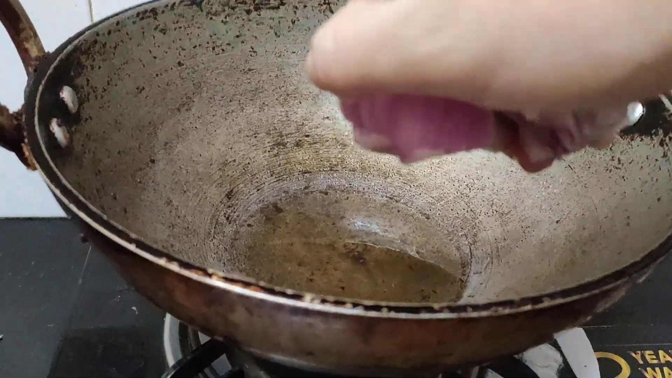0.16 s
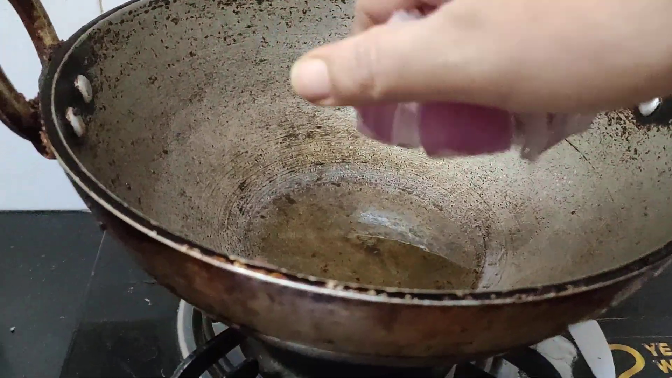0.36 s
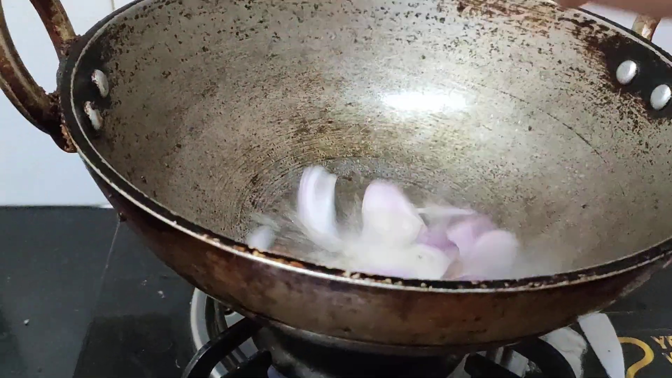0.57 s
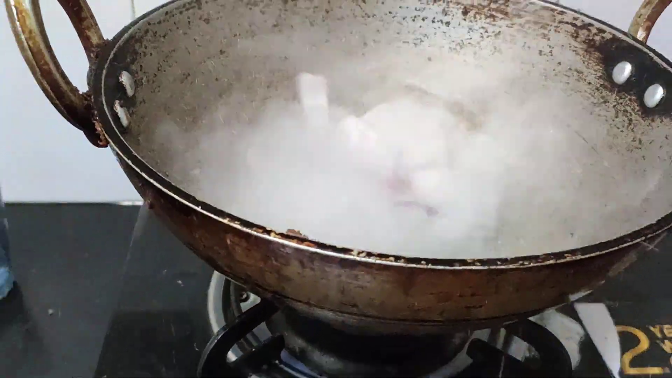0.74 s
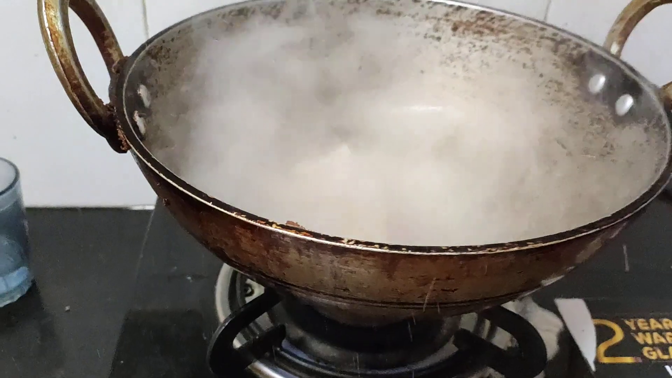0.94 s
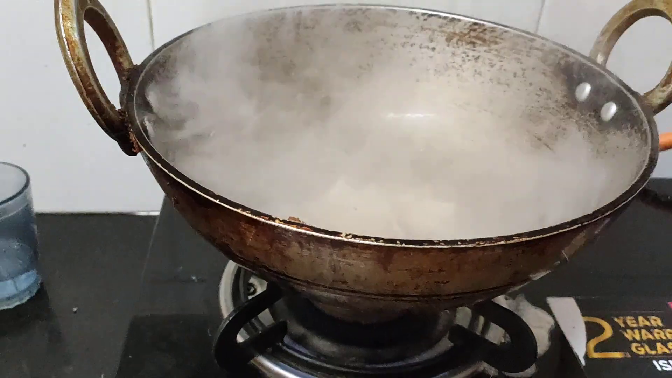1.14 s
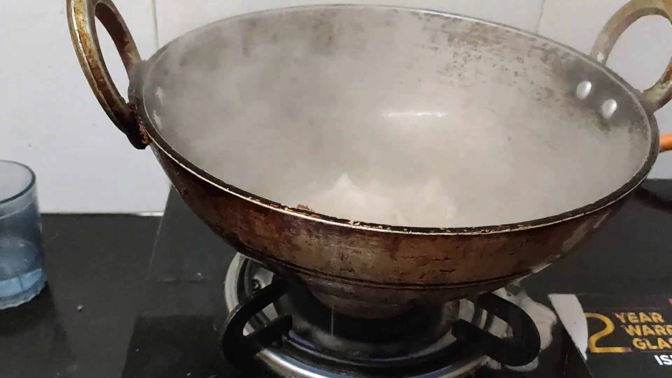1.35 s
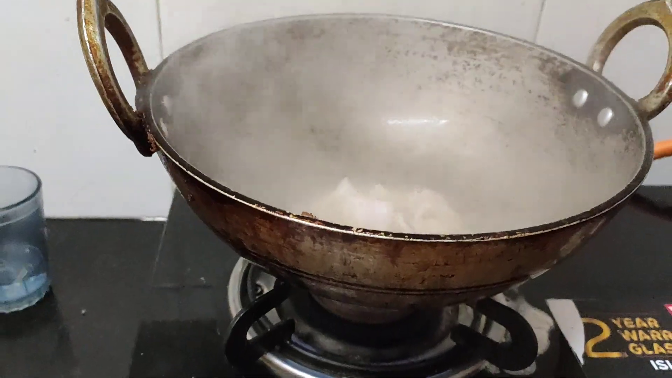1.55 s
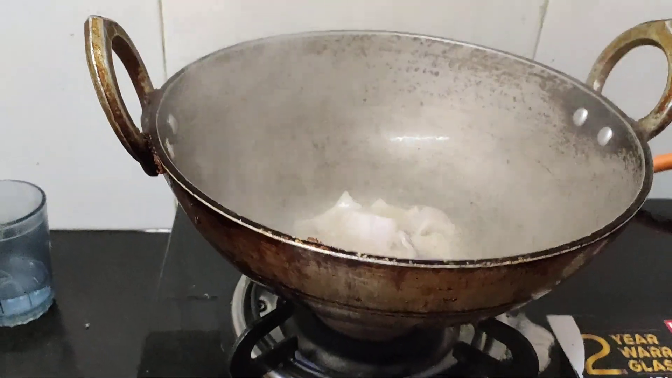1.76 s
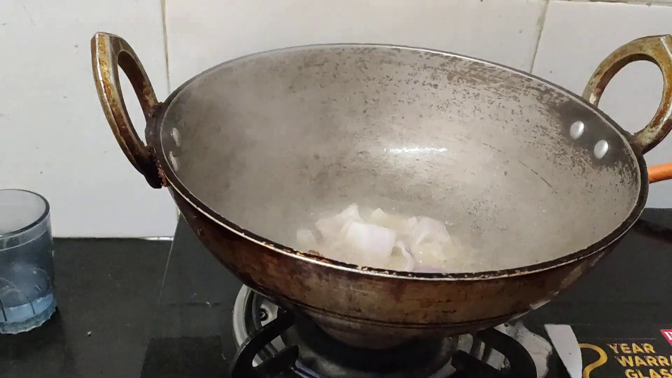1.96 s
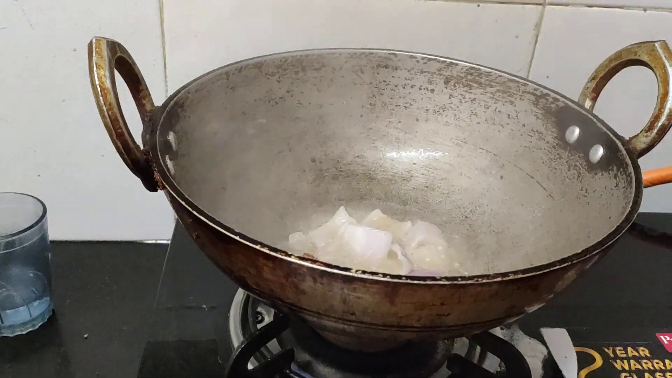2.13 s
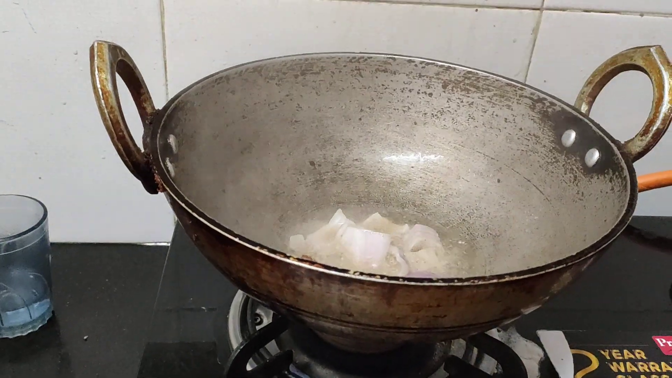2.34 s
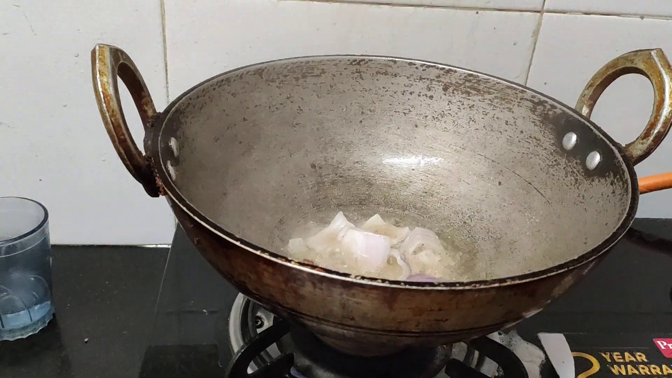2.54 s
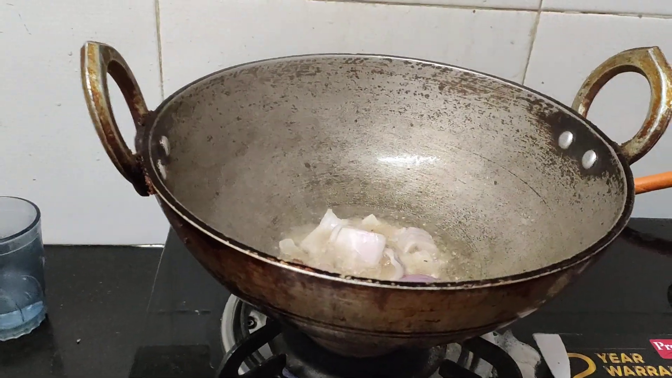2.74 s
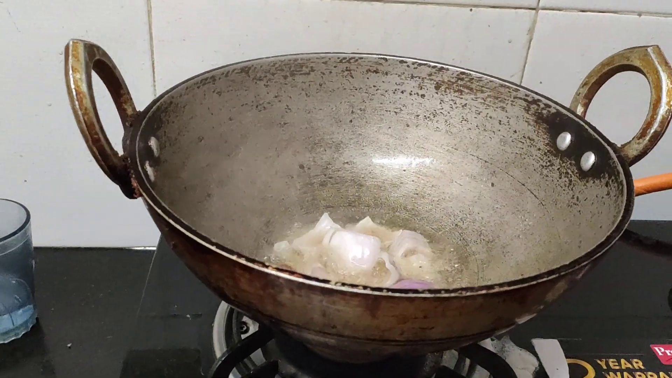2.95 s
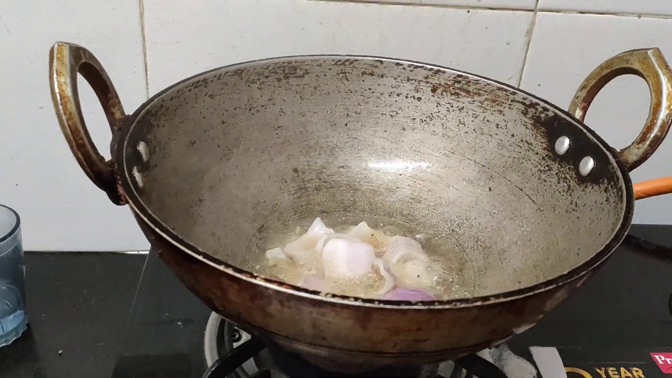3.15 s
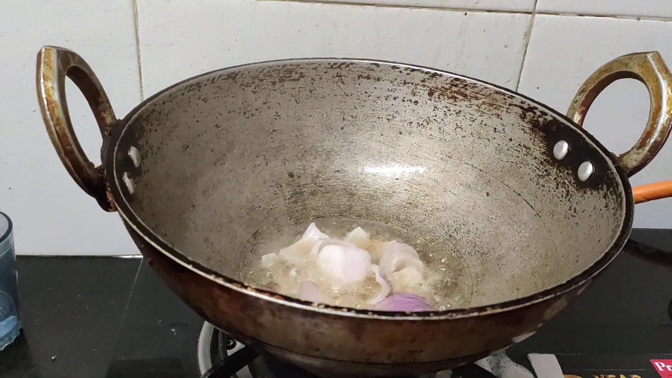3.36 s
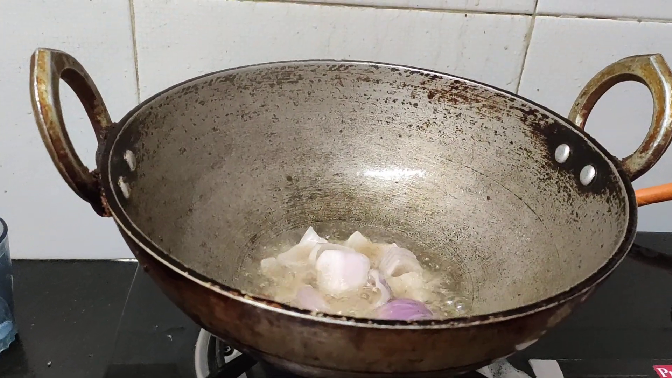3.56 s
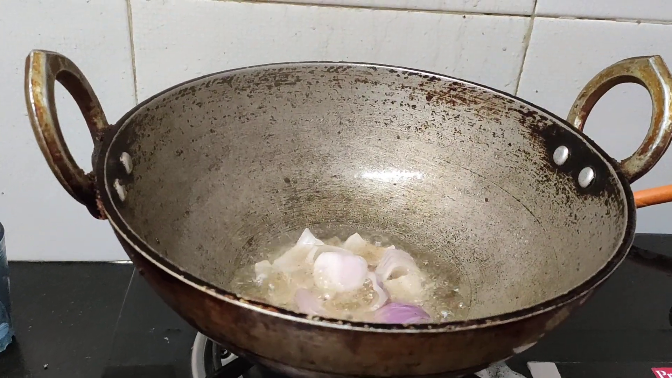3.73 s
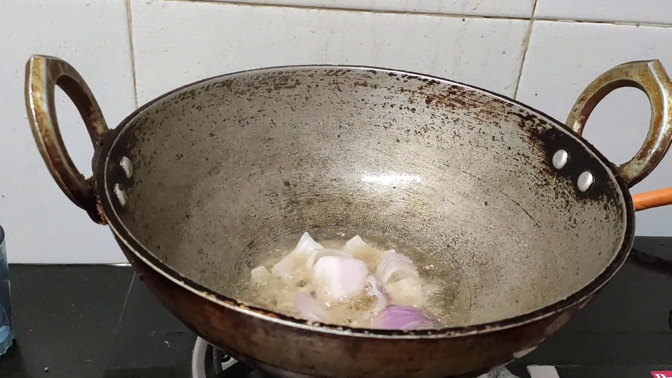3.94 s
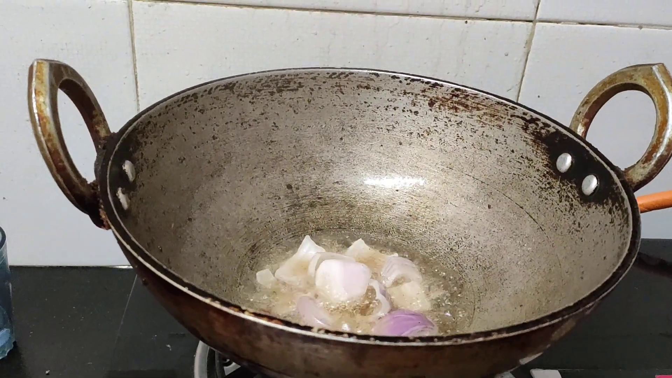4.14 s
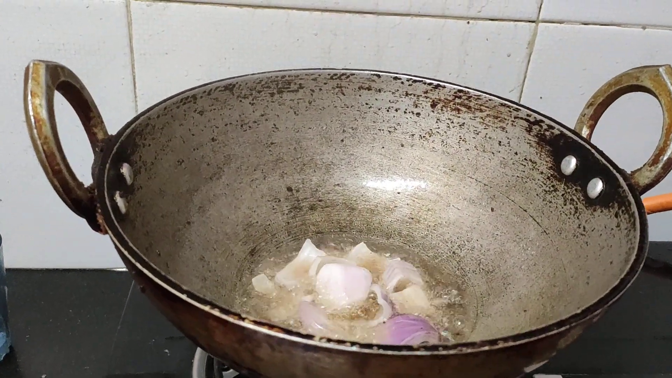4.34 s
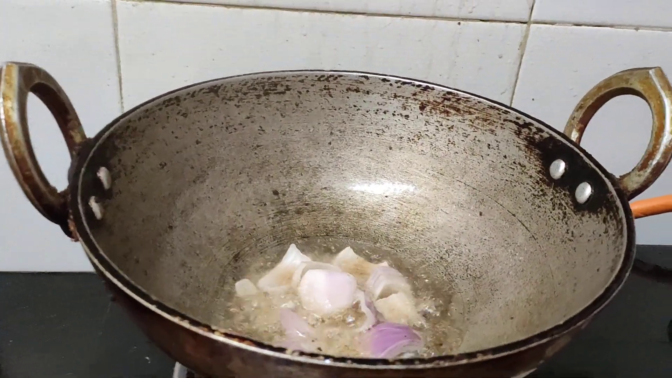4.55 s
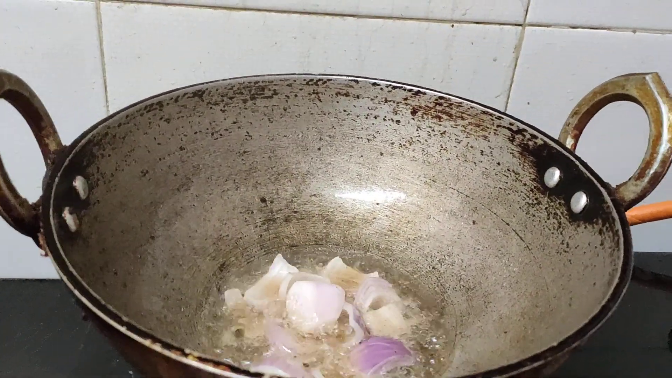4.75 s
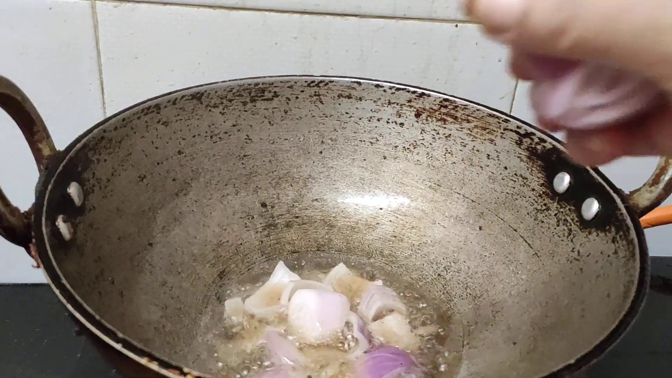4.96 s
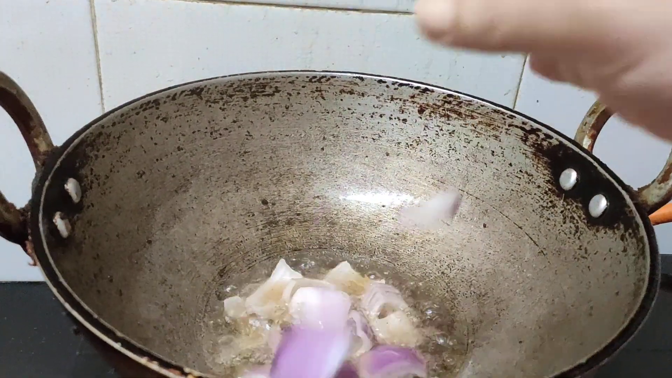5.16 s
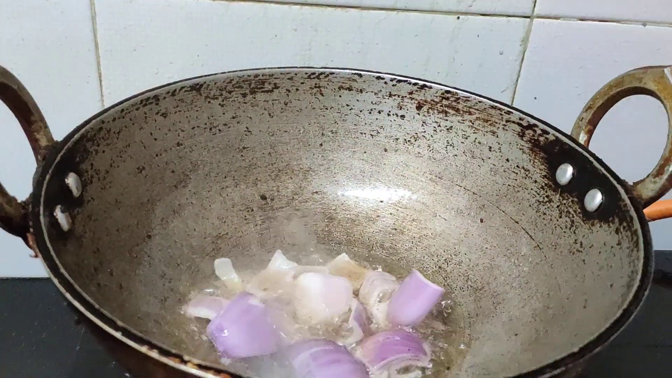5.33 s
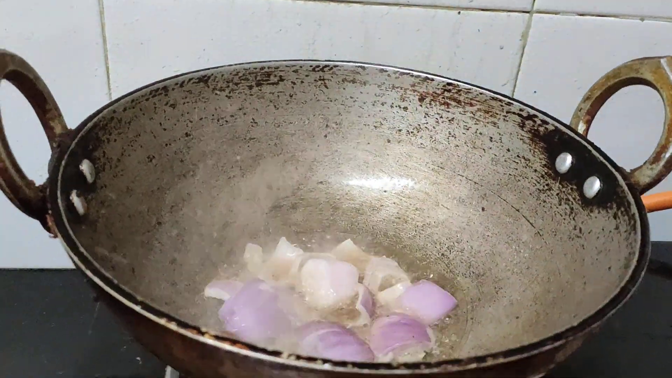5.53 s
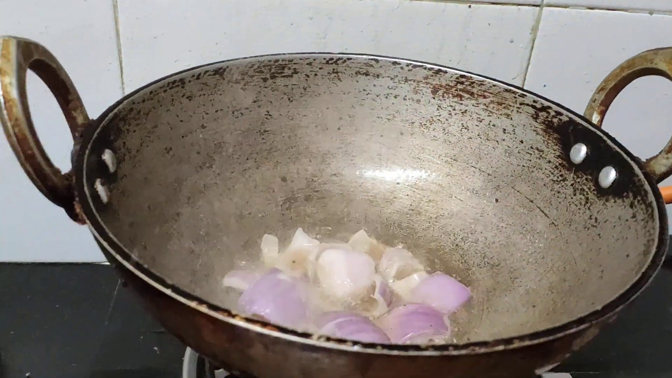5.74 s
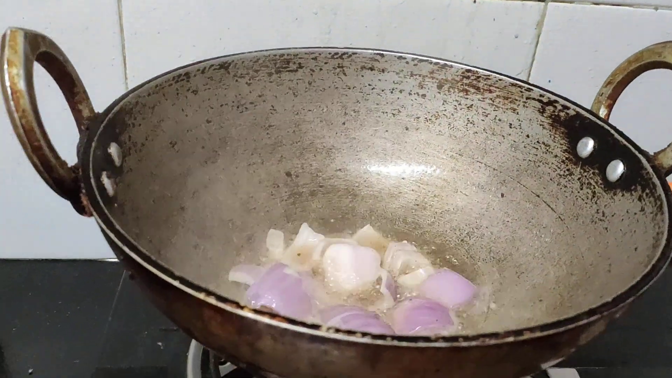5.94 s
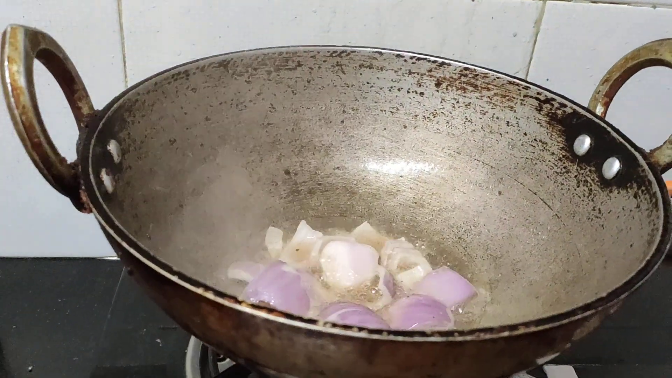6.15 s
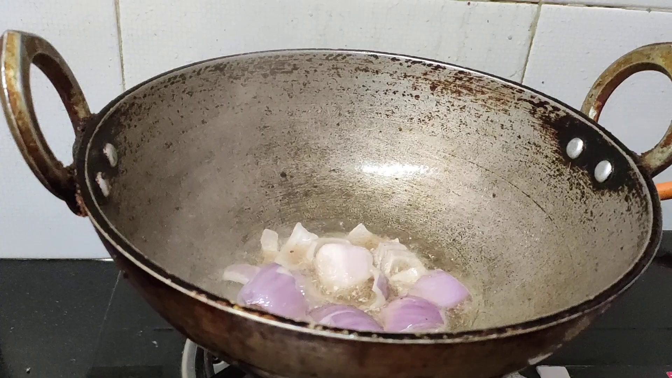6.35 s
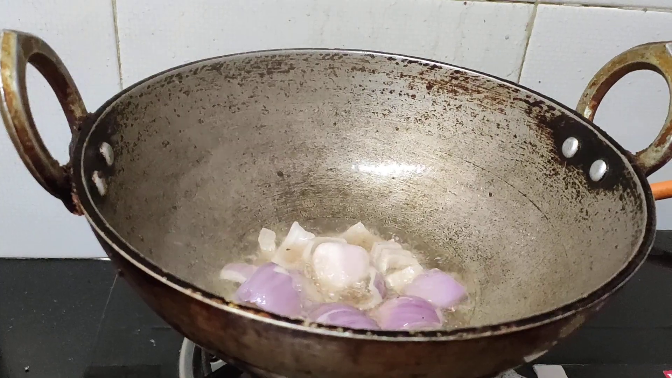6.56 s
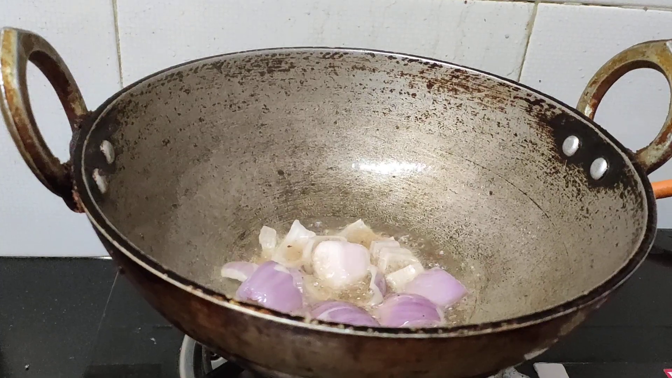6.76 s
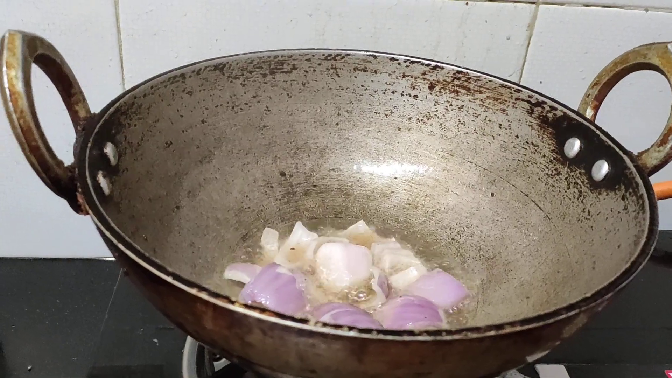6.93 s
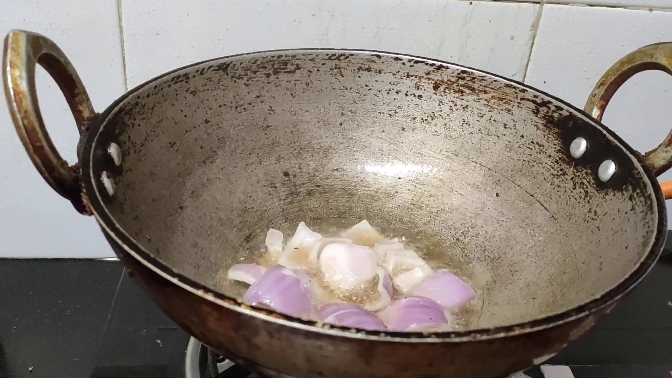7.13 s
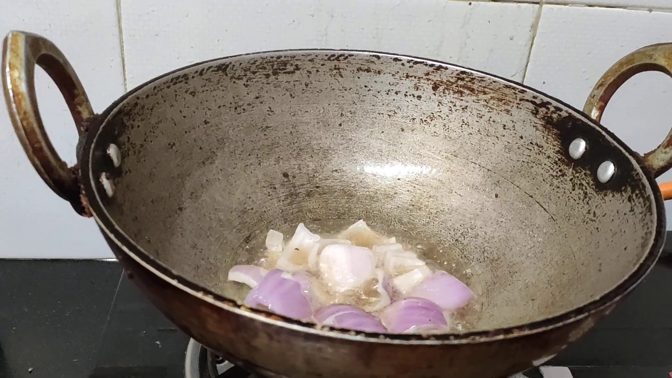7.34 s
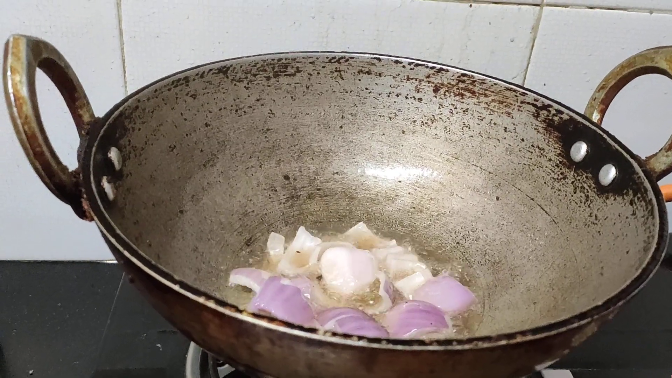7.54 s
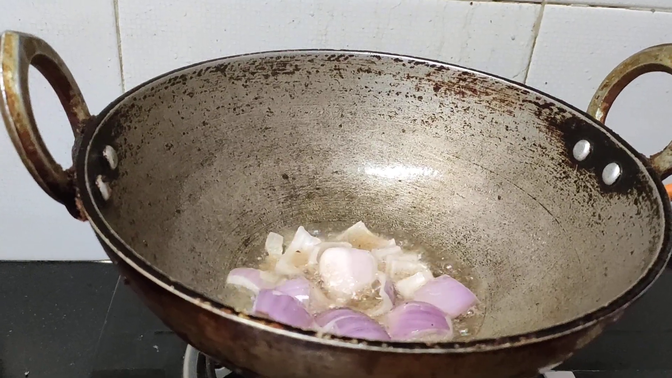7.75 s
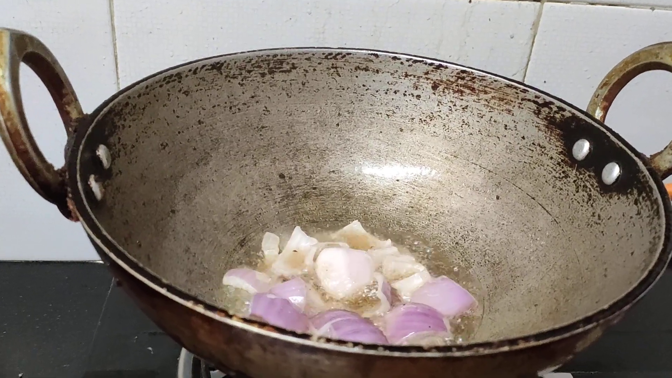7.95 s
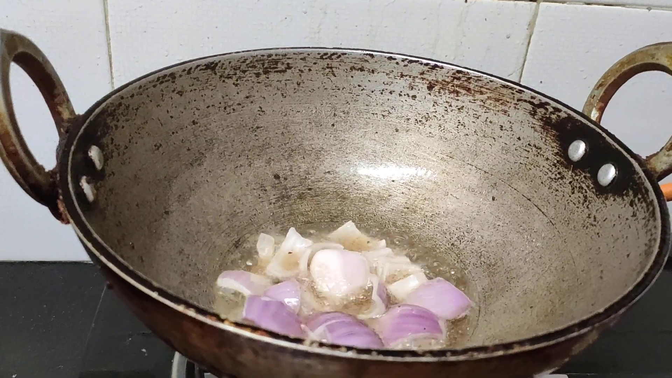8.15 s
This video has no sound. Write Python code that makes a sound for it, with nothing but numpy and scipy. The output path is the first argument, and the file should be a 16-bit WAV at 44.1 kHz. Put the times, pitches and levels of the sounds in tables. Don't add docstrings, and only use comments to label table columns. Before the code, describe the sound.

Chopped onion hits hot oil in a steel pan with an explosive hiss, settles into crackling frying, then surges again with a second handful.

```python
import sys
import numpy as np
from scipy import signal
from scipy.fft import rfft, irfft, next_fast_len
from scipy.io import wavfile
from scipy.ndimage import uniform_filter1d, map_coordinates

SR = 44100
rng = np.random.default_rng(int(sys.argv[2]) if len(sys.argv) > 2 else 0)


def decibels_to_gain(level_db):
    exponent = np.asarray(level_db, float) / 20
    return 10 ** exponent


def log_audio(samples):
    frames = np.atleast_2d(samples).T
    limited = np.clip(frames, -1, 1)
    pcm = np.round(limited * 32767).astype(np.int16)
    wavfile.write(sys.argv[1], SR, pcm)


N = 361398


def unit(x):
    return x / np.sqrt(np.mean(x ** 2) + 1e-20)


def along(points, hz):
    f, v = np.transpose(points)
    return np.interp(np.log(hz + 1), np.log(f + 1), v)


def filtered(x, response):
    m = next_fast_len(N + SR // 2, real=True)
    return irfft(rfft(x, m) * response(np.fft.rfftfreq(m, 1 / SR)), m)[..., :N]


def wobble(rate):
    knots = rng.standard_normal(int(N * 60 / SR) + 4)
    return map_coordinates(knots, [np.arange(N) * np.clip(rate, .1, 59) / SR])


def sides(db):
    return decibels_to_gain(np.multiply.outer([.5, -.5], db))


def add(track, s, sound):
    start = round(s * SR)
    track[:, start:start + sound.shape[1]] += sound[:, :N - start]


def strewn(count):
    moments = 1.0 + rng.random(count) * (N / SR - 1.1)
    return moments, *np.clip(rng.standard_normal((3, count)), -2, 1.5)


# frequency in Hz, left-right likeness from 0 to 1.
COHERENCE = [(60, 0.97), (180, 1), (550, 0.8), (1650, 0.29), (4970, 0.11), (15000, -0.0)]


def bursts(spectrum, share, spread_db, grain_db, patchy_db):
    z = signal.stft(rng.standard_normal((2, N)), nperseg=256)[2]
    field = uniform_filter1d(rng.standard_normal(z.shape[1:]), size=5, axis=0)
    field = uniform_filter1d(field, size=12, axis=1)
    noise = unit(signal.istft(z * decibels_to_gain(patchy_db * unit(field)), nperseg=256)[1][:, :N])

    clicks = (rng.random(N) < share) * decibels_to_gain(spread_db * np.minimum(rng.exponential(size=N), 3.0))
    life = uniform_filter1d(clicks, size=9)
    pair = noise + decibels_to_gain(grain_db) * unit(life * rng.standard_normal((2, N)))

    def mid_side(hz):
        angle = np.arccos(np.clip(along(COHERENCE, hz), -1, 1)) / 2
        return decibels_to_gain(along(spectrum, hz)) * [np.cos(angle), np.sin(angle)]

    mid, side = filtered(pair, mid_side)
    return unit(np.array([mid + side, mid - side]))


# frequency in Hz, level in dB per Hz.
FIZZ_SPECTRUM = [(1760, -21.5), (3000, -8.5), (3300, -7.5), (3590, -6.5), (4000, -3.5), (4530, -3),
                 (4890, -1.5), (9130, 1), (12700, -3), (15500, -3)]
FROTH_SPECTRUM = [(760, -76), (1300, -0.5), (1620, -4.5), (2120, 3.5), (3010, 5), (5000, 0), (6500, 2),
                  (11000, -120)]
SEETHE_SPECTRUM = [(190, -30), (330, -11.5), (404, -18.5), (492, -17.5), (701, 2), (970, -4.5), (1340, -4),
                   (1500, -2), (2000, 1), (2600, -13.5), (4400, -120)]
# frequency in Hz, left-right difference in dB.
COARSE_TILT = [(60, 2.0), (180, -4), (550, 2), (1650, -5.5), (4970, 0.5), (15000, -8)]
# time in seconds, vigour in dB, coarseness of the bubbles in dB.
BOILING = [(.6, 1, -0.5), (.76, -3.5, -3), (.95, -10.5, -0.5), (1.3, -17.5, -2), (1.9, -21.5, -2.5),
           (2.4, -23.5, -0.5), (3.0, -27, -0.5), (3.5, -22, 0.5), (4.3, -24.5, 3.5), (5.08, -26.5, -2),
           (5.22, -23.5, 0), (5.29, -15, -5), (5.43, -12, -2.5), (5.85, -14.5, -1), (6.1, -15, -0.5),
           (6.75, -22, 0.5), (7.6, -26, 0.5), (8.19, -24, -1.5)]
# time in seconds, swell in dB.
BOIL_SURGES = [(1.42, -1.5), (1.75, 4), (2.12, -1.5), (2.68, 5), (2.92, 6), (3.03, -1), (3.52, 0),
               (3.82, 4.5), (4.3, 3.5), (4.63, 0), (4.92, 5.5), (6.03, 4), (6.36, 2), (6.56, -0.5),
               (7.06, -1.5), (7.31, 6), (7.8, 2.5), (8.05, 1)]


def sizzle():
    t = np.arange(N) / SR
    s, *columns = np.transpose(BOILING)
    vigour_db, coarse_db = [np.interp(t, s, c) for c in columns]

    flash_s, flash_db, flash_db_per_s, drip_db_per_s = 0.5463, -40.5, 796, 500
    onset_db = flash_db + np.where(t > flash_s, flash_db_per_s, drip_db_per_s) * (t - flash_s)
    knee_db = 12.5

    def risen(lag_db):
        return -knee_db * np.logaddexp(-vigour_db / knee_db, (lag_db - onset_db) / knee_db)

    surge_db = np.zeros(N)
    for at, db in BOIL_SURGES:
        width_s = np.where(t < at, 0.017, 0.12)
        surge_db += db * np.exp(-((t - at) / width_s) ** 2)

    fizz_db = risen(0) + 0.28 * surge_db
    froth_db = risen(10.5) + coarse_db + surge_db - 6.5
    seethe_db = 1.154 * risen(20) + 1.14 * coarse_db + 1.1 * surge_db - 14.5

    calm_db, gust_depth_db, flutter_db = -11, 1.2, 1.0
    gust = wobble(14) * np.clip((calm_db - vigour_db) / 12, .15, 1)
    pan_db = np.clip(-.25 * (fizz_db + 11), -2.5, 2.5)

    fizz = decibels_to_gain(fizz_db + 1.78 + 0.41 * gust + 0.75 * wobble(40)) * sides(pan_db)
    fizz = fizz * bursts(FIZZ_SPECTRUM, 0.037, 4.4, -4.5, patchy_db=2.05)
    froth = decibels_to_gain(froth_db + gust_depth_db * gust + flutter_db * wobble(25))
    froth = froth * bursts(FROTH_SPECTRUM, .006, 2.7, -1.4, patchy_db=.5)
    seethe = decibels_to_gain(seethe_db + 2 * gust_depth_db * gust + 0.44 * wobble(25))
    seethe = seethe * bursts(SEETHE_SPECTRUM, .003, 1.64, -3.9, patchy_db=0.5)

    fizz = fizz + 0.027 * np.clip(fizz_db + 23.0, 0, 12) * filtered(fizz, lambda hz: hz > 10000)
    return fizz + filtered(froth + seethe, lambda hz: sides(along(COARSE_TILT, hz)))


# time in seconds, peak in dB, spray after it in dB, spray length in seconds.
LOUD_SPITS = [(1.277, -7, -12, 0.038), (1.7666, -9, -8, 0.032), (1.92, -11.5, -8.5, 0.055),
              (1.934, -10, -6, 0.011), (2.142, -14.5, -8, .024), (2.533, -12, -11.5, 0.023),
              (2.724, -17, -6, .023), (2.918, -11.5, -9, 0.042), (3.182, -10, -12.5, 0.093),
              (3.293, -6.5, -11.5, 0.046), (3.388, -11.5, -7, 0.021), (3.453, -12.5, -11, .048),
              (3.523, -13.5, -10.5, 0.064), (3.69, -13, -8.5, 0.056), (3.823, -13, -5, 0.11),
              (4.0176, -7.5, -9.5, 0.044), (4.188, -14, -17, .025), (4.416, -7, -14, 0.029),
              (4.625, -11.5, -20, .03), (4.738, -10.5, -10, .025), (4.858, -10.5, -14, .019),
              (4.9165, -8, -12, 0.079), (5.355, -7, -9, 0.087), (5.547, -19, -22, .024),
              (6.0913, 0, -16, 0.073), (6.4198, -11, -12, .04), (6.5582, -12.5, -10, .039),
              (6.865, -12, -16, .024), (7.366, -13, -15, 0.022), (7.6895, -8, -15, .015)]
# time in seconds, peak in dB.
MORE_SPITS = [(1.261, -6), (1.872, -14), (2.934, -15.5), (3.1455, -19), (3.334, -14), (3.378, -12),
              (3.397, -17), (3.559, -11), (3.75, -15), (4.295, -19), (4.4968, -14), (4.5822, -27),
              (4.634, -11.5), (4.727, -14), (5.1633, -18), (5.1994, -13.5), (6.354, -8), (6.4762, -12),
              (6.657, -13), (6.796, -13), (7.0763, -21), (7.12, -18), (7.381, -14), (8.0898, -14.5)]


def spits():
    out, t = np.zeros((2, N)), np.arange(SR // 8) / SR
    late = np.maximum(t - np.array([[.000025], [0]]), 0)
    crack_hz, crack_s, crack_db = 7000, .0003, 5
    spray_small_db, spray_small_s = -14, 0.014

    at, size, wet, long = strewn(120)
    small = zip(at, -22.5 + 3.5 * size, spray_small_db + 3.8 * wet, spray_small_s * np.exp(.6 * long))
    more = [(s, db, spray_small_db, spray_small_s) for s, db in MORE_SPITS]
    for s, db, spray_db, hold in [*LOUD_SPITS, *more, *small]:
        noise = rng.standard_normal((3, len(t)))
        side, pitch = rng.standard_normal(2)
        ring = np.sin(2 * np.pi * crack_hz * np.exp(.25 * pitch) * late) + 0.64 * noise[:2]
        crack = decibels_to_gain(crack_db) * np.exp(-t / crack_s) * ring
        sputter = decibels_to_gain(3.2 * unit(uniform_filter1d(noise[2], size=30)))
        envelope = np.exp(-(t / (0.99 * hold)) ** 3) + 0.5 * np.exp(-t / 0.0033)
        spray = decibels_to_gain(spray_db) * envelope * sputter * noise[:2]
        pan = sides(2 + 2.5 * side)[:, None]
        add(out, s, decibels_to_gain(db + 3.5) * (pan * crack + 0.78 * spray))
    return filtered(out, lambda hz: decibels_to_gain(along(FIZZ_SPECTRUM, hz)))


# time in seconds, peak in dB, pitch in Hz, 60 dB decay time in seconds.
LARGE_BUBBLES = [(.548, -29, 740, 0.0098), (1.3858, -7.5, 2600, 0.0025), (1.4314, -11, 2200, 0.0086),
                 (1.7532, -13, 2440, .013), (2.1244, -21, 1250, .0054), (2.1493, -17.5, 1520, 0.0063),
                 (2.528, -19.5, 2040, 0.013), (2.652, -17, 2120, 0.0053), (2.693, -14, 1260, 0.006),
                 (2.7246, -18, 2120, 0.0099), (2.9183, -11.5, 1450, 0.022), (2.924, -18, 4280, 0.023),
                 (2.926, -22, 2570, 0.023), (4.128, -18, 1960, 0.017), (3.2933, -32, 760, .0063),
                 (3.4476, -14.5, 2070, 0.017), (3.511, -21, 810, .012), (3.5607, -16.5, 2010, .02),
                 (3.6601, -20.5, 1170, 0.0072), (3.8384, -18, 1470, 0.027), (4.525, -20.5, 1820, 0.022),
                 (4.1013, -17, 2395, 0.034), (4.2956, -22, 1960, .01), (4.5822, -15, 4170, 0.0097),
                 (3.895, -23, 1480, .015), (6.3336, -14, 3700, .014), (6.8637, -20, 2340, 0.011),
                 (7.0601, -20, 1410, 0.033), (7.3149, -13.5, 2930, 0.0078), (7.381, -20, 1710, 0.012)]
# time in seconds, peak in dB.
POCKET_POPS = [(1.5055, -15.5), (2.464, -29), (2.809, -29), (3.0308, -18.5), (3.169, -17), (3.4411, -15.5),
               (3.82, -17), (3.9722, -22), (4.0487, -13), (4.186, -25), (4.4065, -19), (4.497, -19),
               (4.593, -21), (4.6803, -17), (4.855, -18), (4.9138, -31), (5.1619, -34), (5.4483, -8),
               (6.4663, -16), (6.607, -15), (6.6491, -16), (7.1232, -19), (7.6885, -20), (8.0592, -23),
               (8.0844, -18.5)]
# time in seconds, peak in dB.
UNDER_POPS = [(1.14, -15.5), (2.945, -21), (3.862, -21), (4.93, -25), (5.365, -25), (5.423, -22),
              (5.693, -17), (6.294, -19), (6.419, -18), (6.55, -22.5), (7.9412, -26), (8.058, -22)]


def bubbles():
    out, t = np.zeros((2, N)), np.arange(SR // 22) / SR
    late = np.maximum(t - np.array([[.00008], [0]]), 0)

    at, size, pitch, long = strewn(260)
    small = zip(at, -32.5 + 3.5 * size, 2300 * np.exp(.4 * pitch), .006 * np.exp(.4 * long))
    pocket = [(s, db, 3050 * np.exp(.03 * rng.standard_normal()), .008) for s, db in POCKET_POPS]
    under = [(s, db, 1470 * np.exp(0.053 * rng.standard_normal()), 0.01) for s, db in UNDER_POPS]
    for s, db, hz, t60 in [*LARGE_BUBBLES, *pocket, *under, *small]:
        t60 = max(t60, .003)
        pan_db = -1.5 + 2 * rng.standard_normal()
        rough = unit(uniform_filter1d(rng.standard_normal(len(t)), size=60))
        ragged = 1 + 1.7 * np.minimum((t / 0.0042) ** 2, 1) * rough
        tone = 0.78 * ragged * decibels_to_gain(-60 * t / t60) * np.sin(2 * np.pi * hz * late * (1 + 4 * late))
        snap = 0.014 / t60 * decibels_to_gain(-60 * t / 0.00084) * np.sin(2 * np.pi * 1.09 * hz * late)
        add(out, s, decibels_to_gain(db + 5.5) * sides(pan_db)[:, None] * (tone + snap))
    return filtered(out, lambda hz: (1j * hz / (1j * hz + 300)) ** 2)


# time in seconds, peak in dB, pitch in Hz, 60 dB decay in seconds.
LONE_DRIP = (5.2076, -0.5, 2250, .013)


def drip():
    s, db, hz, t60 = LONE_DRIP
    out, t = np.zeros((2, N)), np.arange(SR // 20) / SR
    plink = (1 - np.exp(-t / .0007)) * decibels_to_gain(db - 60 * t / t60) * np.sin(2 * np.pi * hz * t)
    add(out, s, sides(-7)[:, None] * plink)
    return out


# frequency in Hz, 60 dB decay time in seconds.
WALL_DECAY = [(300, 0.073), (2000, 0.21), (12000, 0.0023)]


def pan_wall(x):
    hz, t, z = signal.stft(rng.standard_normal((2, SR // 8)), SR, nperseg=128)
    decay = decibels_to_gain(-60 * t / along(WALL_DECAY, hz)[:, None])
    tail = signal.istft(z * decay, SR, nperseg=128)[1]
    return signal.fftconvolve(x, tail / np.linalg.norm(tail[0]), axes=1)[:, :N]


# frequency in Hz, level in dB per Hz.
HISS_SPECTRUM = [(76, -39), (130, -2), (190, -8.5), (350, -2.5), (460, -10.5), (640, -5.5), (1050, -10.5),
                 (2270, -11.5), (10300, -21), (12500, -21), (15000, -45)]
RUMBLE_SPECTRUM = [(8, -28), (20, -1.5), (25, -10), (35, -27), (70, -23), (130, -20.5), (170, -120)]


def kitchen():
    phase = 2 * np.pi * 100.1 * np.arange(N) / SR + 0.29 * wobble(3.1)
    hum = decibels_to_gain(-37.0 + 0.89 * wobble(16)) * np.sin(phase) * sides(2.7)[:, None]
    rumble = filtered(rng.standard_normal(N), lambda hz: decibels_to_gain(along(RUMBLE_SPECTRUM, hz)))
    hiss = sides(2.2)[:, None] * bursts(HISS_SPECTRUM, 0.0053, 1.4, -23, patchy_db=1.5)
    return hum + decibels_to_gain(-47) * unit(rumble) + decibels_to_gain(-49.5) * hiss


def scene():
    pops = spits() + bubbles() + drip()
    return sizzle() + pops + decibels_to_gain(-13) * pan_wall(pops) + kitchen()


# time in seconds, peak in dB.
DIAPHRAGM_THUMPS = [(.8063, -3), (0.8146, -11), (.868, -24), (1.162, -14), (3.2935, -3.5), (3.3961, -20),
                    (5.3323, -13), (5.3368, -8), (5.3655, -3.5), (5.394, -6), (5.399, -12), (5.422, 3),
                    (5.4271, -7), (5.438, -4), (5.4413, -9), (5.4435, -5), (5.505, -7), (5.52, -12),
                    (5.5532, -9), (5.5845, -6), (5.5883, -6), (5.626, -5), (5.6357, -7), (5.642, -1),
                    (5.67, -5.5), (5.7432, -4.5), (5.8285, -11.5), (5.8625, -6), (5.9814, -8.5),
                    (6.3551, -8)]
# start in seconds, end in seconds, count, level in dB.
FAINT_RATTLE = (5.3, 6.45, 50, -21)
# time in seconds, level in dB, release in seconds.
COLLAPSE = (.733, 8.6, 0.036)


def diaphragm(right):
    push = .5 * uniform_filter1d(np.maximum(abs(right) - .6, 0), size=40)
    extra, t = np.zeros((1, N)), np.arange(SR // 4) / SR
    thump_s = 0.00035
    start, end, count, faint_db = FAINT_RATTLE
    early, size = rng.random((2, count))
    rattle = zip(start + (end - start) * early ** 1.5, faint_db + 8 * size)
    for s, db in [*DIAPHRAGM_THUMPS, *rattle]:
        bump = np.exp(-((t - thump_s) / (.5 * thump_s)) ** 2)
        add(extra, s - thump_s, decibels_to_gain(db) * bump[None])
    stick_s, stick_db, release_s = COLLAPSE
    add(extra, stick_s, -decibels_to_gain(stick_db) * np.exp(-t / release_s)[None])

    def blocked(hz):
        return (1j * hz / (1j * hz + 1.15)) * (1j * hz / (1j * hz + 1.25))

    return right + filtered(push + extra[0], blocked)


# frequency in Hz, dB.
BAND_FLOOR = [(1500, -60), (2600, -4.5), (3600, -1.6), (6500, -1.7), (9500, -2.6), (12000, -.9),
              (15700, -.5)]


def starved(ports):
    lead = 263
    pair = np.pad([ports[0] + ports[1], ports[0] - ports[1]], ((0, 0), (lead, 0))) / 2
    hz, t, z = signal.stft(pair, SR, window="cosine", nperseg=2048)
    power = abs(z) ** 2
    near = uniform_filter1d(uniform_filter1d(power, size=6, axis=1), size=3, axis=2)
    wide = uniform_filter1d(uniform_filter1d(power, size=60, axis=1), size=3, axis=2)

    loud_db = 10 * np.log10(power.sum(axis=(0, 1)) + 1e-9)
    hungry_db = np.outer(hz < 9000, .13 * np.clip(loud_db + 23, -25, 7))
    hungry_db = hungry_db + .15 * np.minimum(loud_db + 30, 0)
    floor = decibels_to_gain(along(BAND_FLOOR, hz)[:, None] + hungry_db) ** 2

    events = LOUD_SPITS + MORE_SPITS + LARGE_BUBBLES + [LONE_DRIP] + POCKET_POPS
    clicks = np.array([s for s, db, *_ in events if db > -14])
    steady = abs(t[:, None] - lead / SR - clicks).min(axis=1) > .012
    kept = (near > wide * floor) | ~steady
    mid, side = signal.istft(z * kept, SR, window="cosine", nperseg=2048)[1][:, lead:lead + N]
    return np.array([mid + side, mid - side])


def roll_off(x):
    return signal.sosfilt(signal.butter(12, 15640, fs=SR, output="sos"), x)


def record(dry):
    ports = np.clip([dry[0], diaphragm(dry[1])], -1, 1)
    mix = starved(ports)
    return roll_off(mix)


dry = scene()
out = record(dry)
log_audio(out)
```